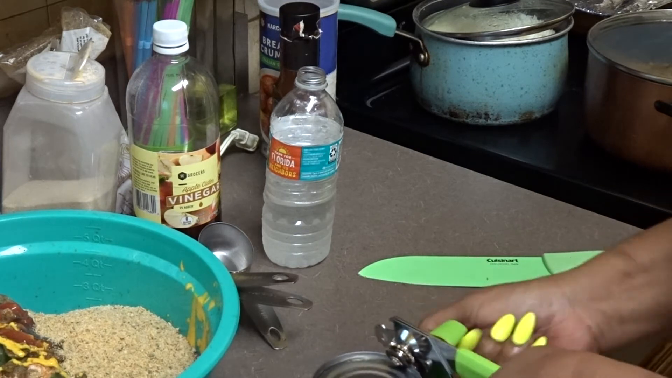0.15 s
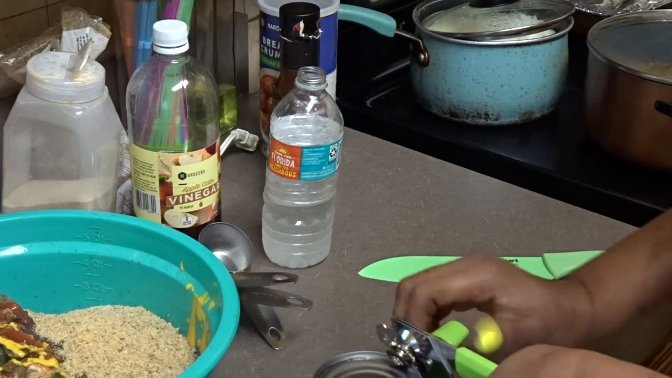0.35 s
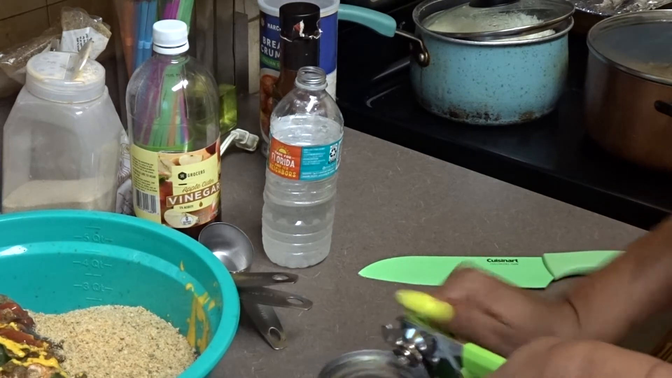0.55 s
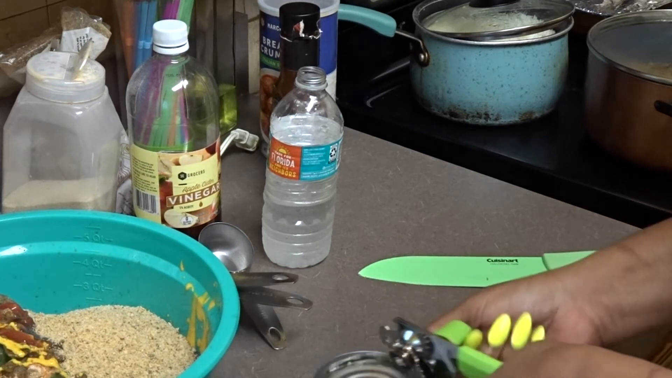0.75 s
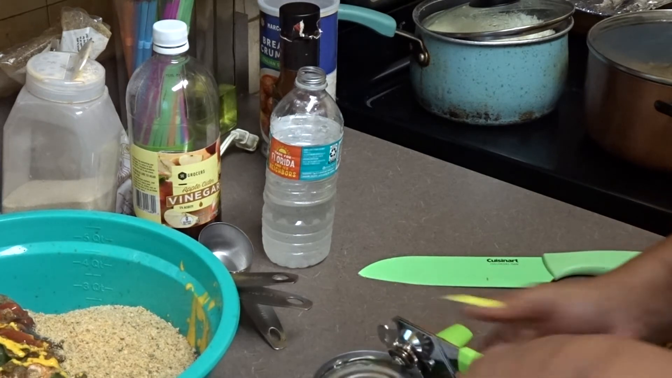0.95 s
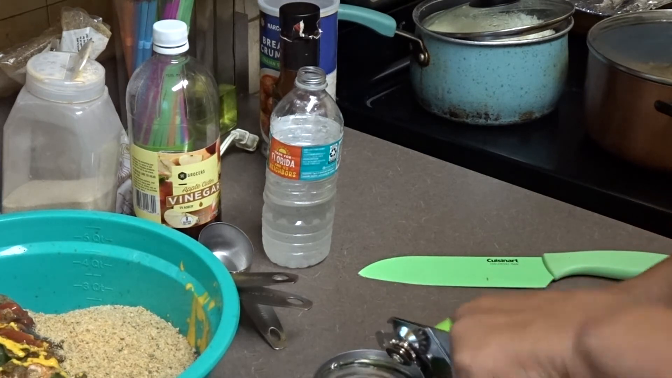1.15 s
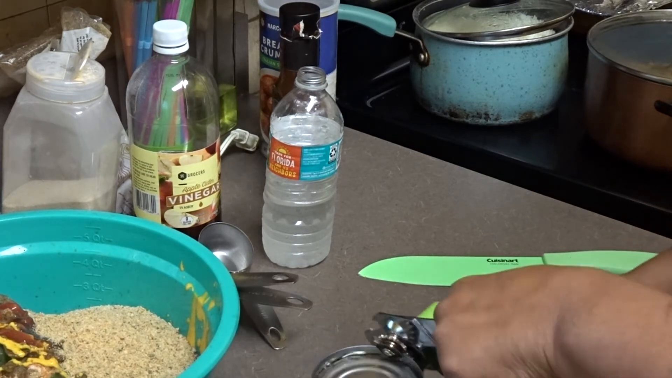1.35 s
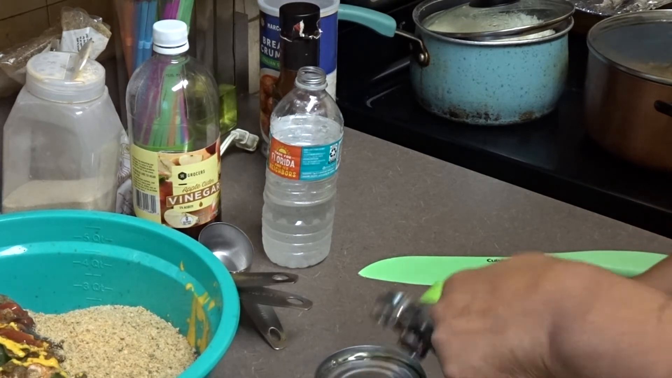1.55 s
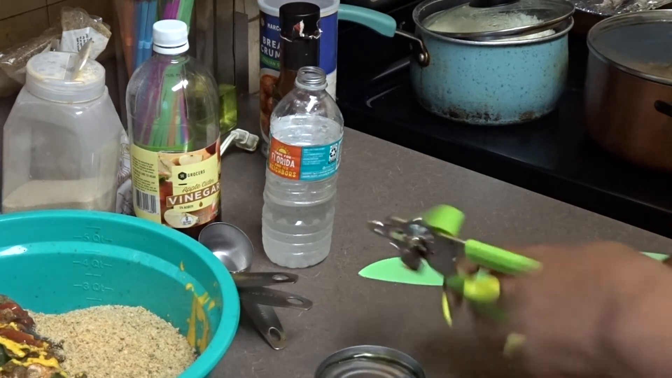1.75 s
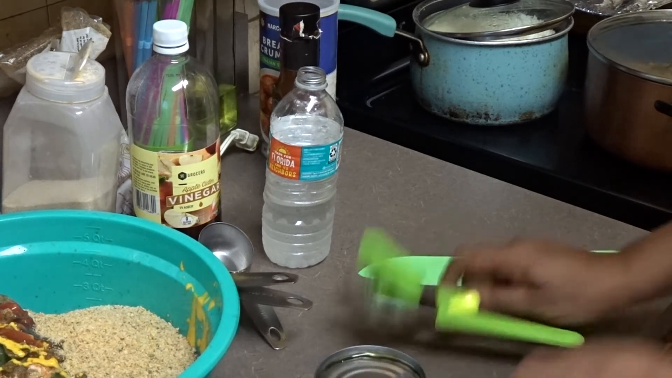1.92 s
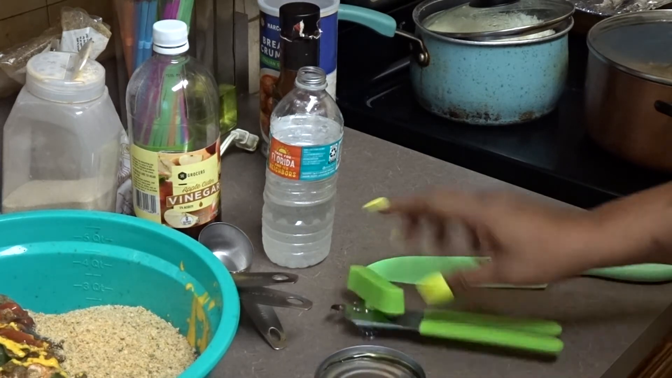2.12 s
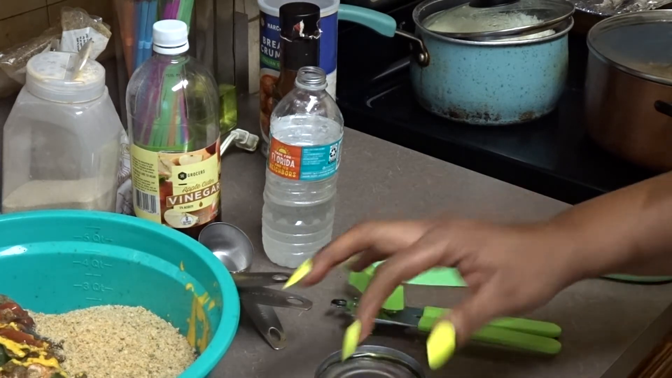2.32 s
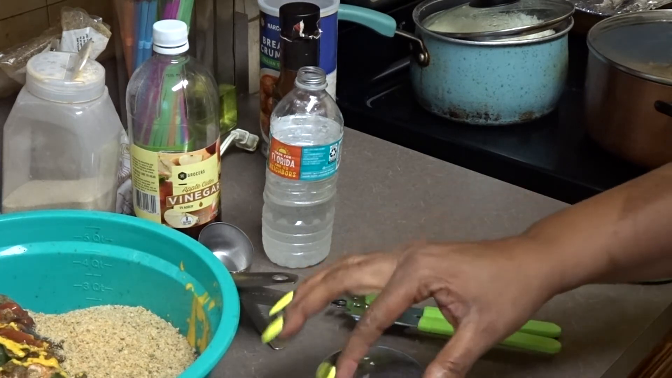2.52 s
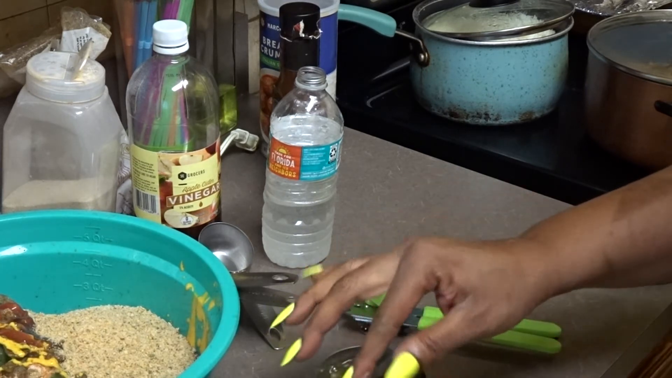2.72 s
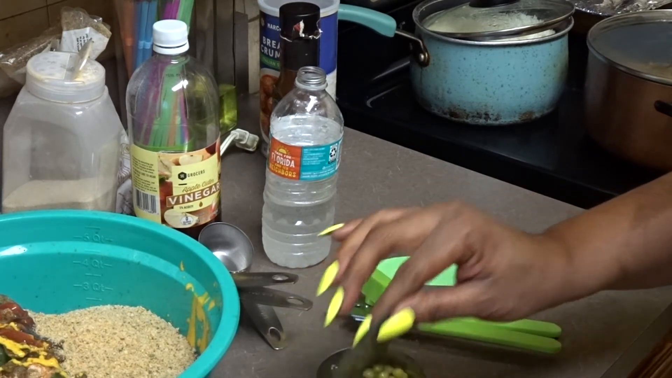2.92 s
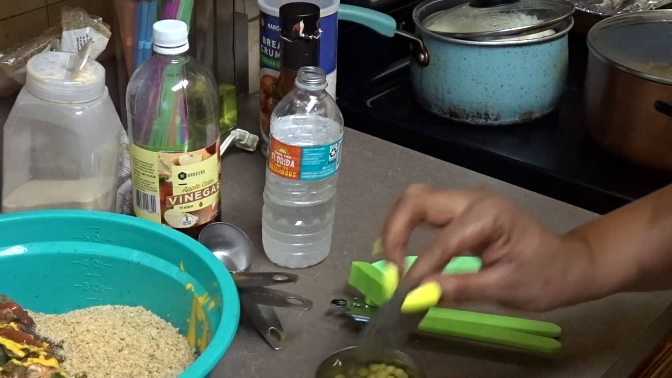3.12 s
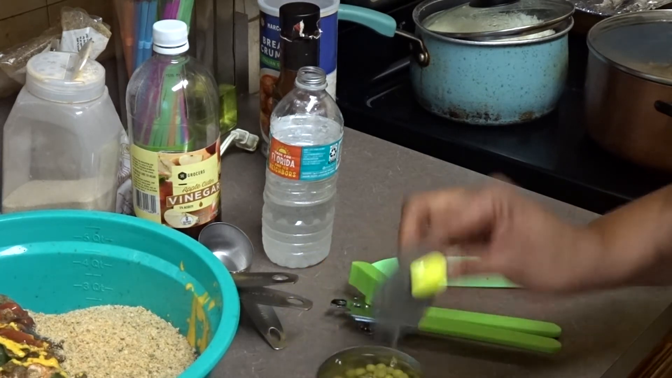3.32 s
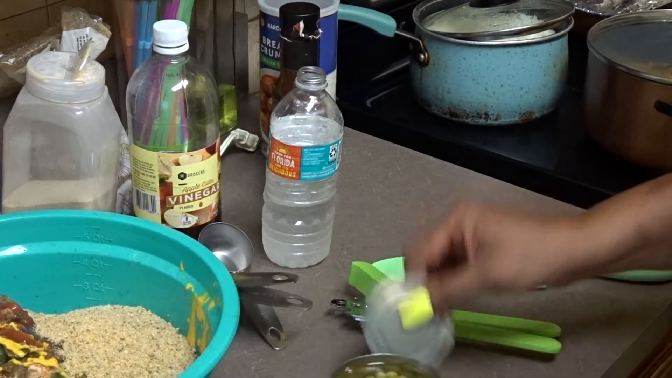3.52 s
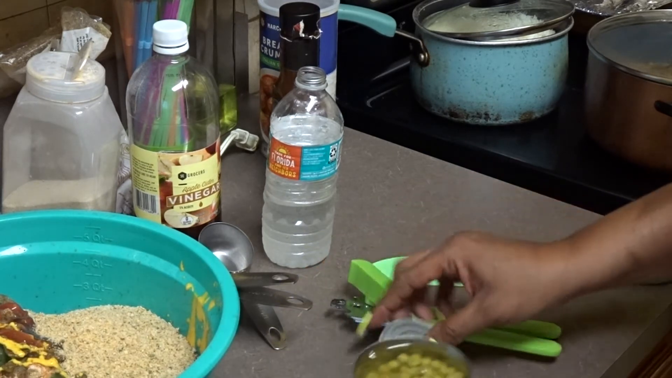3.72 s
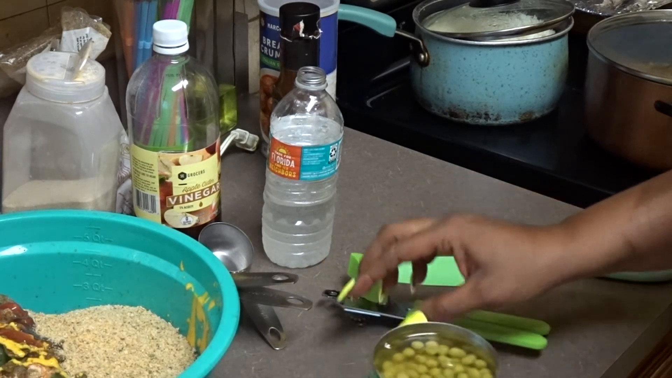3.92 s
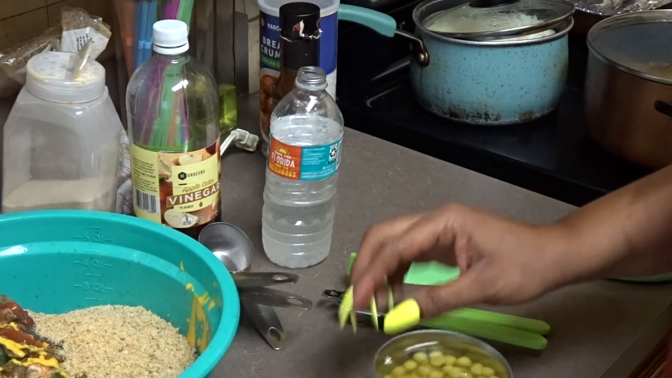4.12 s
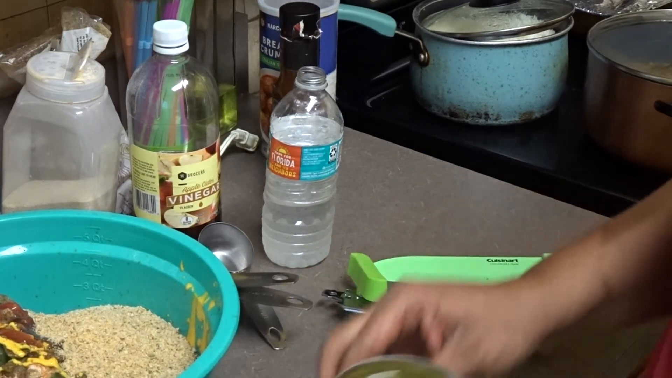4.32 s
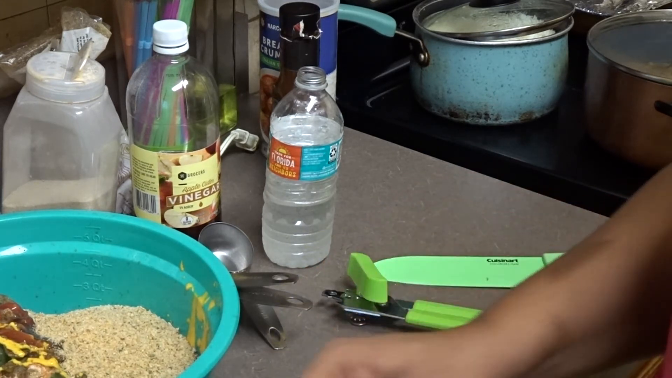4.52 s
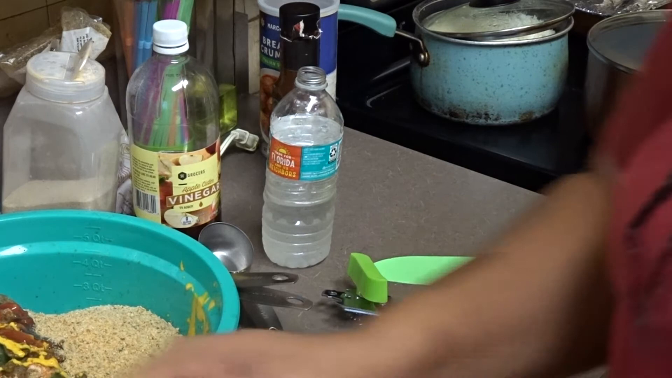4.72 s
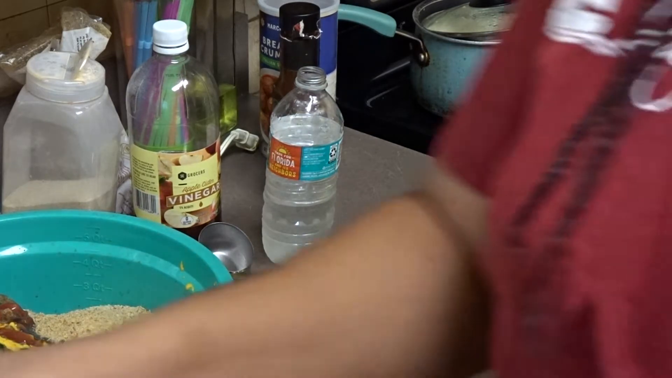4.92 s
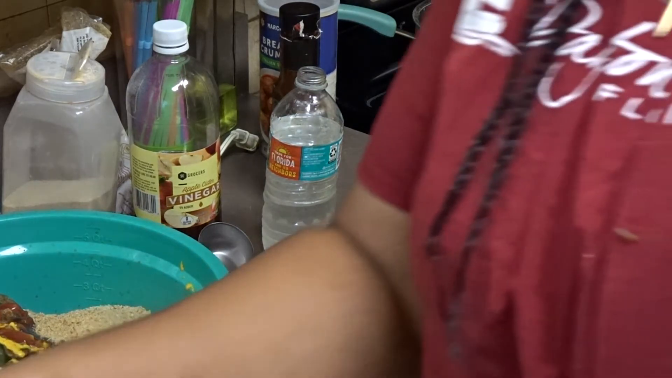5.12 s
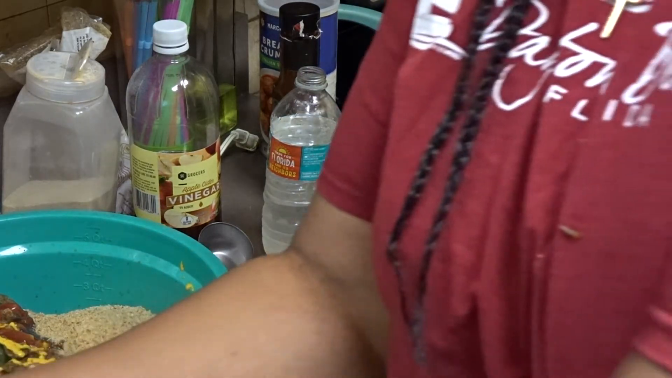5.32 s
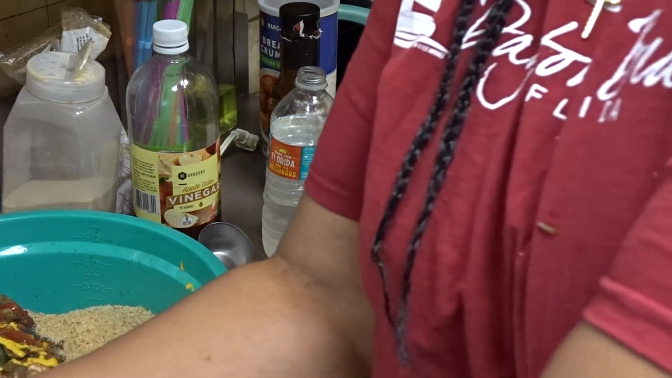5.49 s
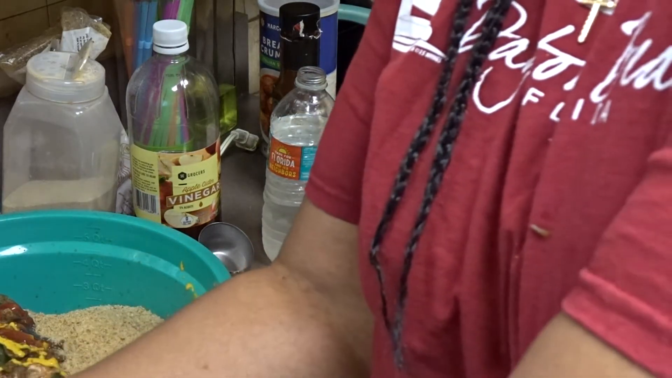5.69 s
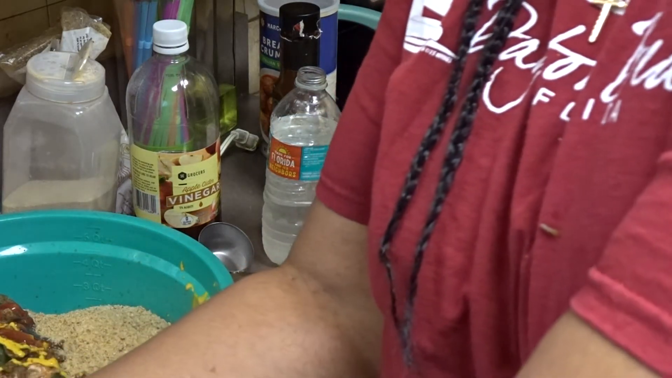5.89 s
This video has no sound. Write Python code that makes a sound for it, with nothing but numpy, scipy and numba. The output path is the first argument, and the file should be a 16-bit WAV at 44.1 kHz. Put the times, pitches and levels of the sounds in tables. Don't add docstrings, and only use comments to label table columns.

```python
import sys
import numpy as np
from scipy import signal
from scipy.fft import rfft, irfft, next_fast_len
from scipy.io import wavfile
from scipy.ndimage import uniform_filter1d
from numba import njit

SR = 44100
rng = np.random.default_rng(int(sys.argv[2]) if len(sys.argv) > 2 else 0)


def undo_db(level):
    steps = np.asarray(level, float) / 20
    return 10 ** steps


def dump(signal):
    limited = np.clip(np.atleast_2d(signal).T, -1, 1)
    pcm = np.round(limited * 32767).astype(np.int16)
    wavfile.write(sys.argv[1], SR, pcm)


N = 262395
BRIGHT_HZ = 4000


def shade(x, points, scale=1):
    hz, db = np.transpose(points)
    size = next_fast_len(x.shape[-1])
    f = np.maximum(np.arange(size // 2 + 1) * SR / size, 1)
    gain = undo_db(scale * np.interp(np.log(f), np.log(hz), db))
    return irfft(rfft(x, size) * gain, size)[..., :x.shape[-1]]


def band(x, hz, width):
    high = np.sqrt(hz ** 2 + width ** 2 / 4) + width / 2
    edges = [hz ** 2 / high, min(high, SR * .45)]
    return signal.sosfilt(signal.butter(2, edges, "band", fs=SR, output="sos"), x)


def unit(x):
    return x / np.sqrt(np.mean(x ** 2))


def add(out, s, sound):
    i = int(np.clip(s * SR, 0, N))
    out[i:i + len(sound)] += sound[:N - i]


def smooth_noise(samples):
    steps = np.repeat(rng.standard_normal(N // samples + 1), samples)[:N]
    return uniform_filter1d(steps, samples)


# frequency_hz, level_db per Hz
HUSH = [(15, -39.5), (25, -4.5), (150, -5), (300, -4.5), (760, -8.5), (1260, -13), (5140, -21.5),
        (16000, -36.5)]
# frequency_hz, side_minus_mid_db
HUSH_SIDE = [(60, -18), (110, -13), (200, -5.5), (380, -3), (700, 2), (2380, 1), (8120, 1.5), (15000, 2)]


def hush():
    mid, side = shade(rng.standard_normal((2, N)), HUSH)
    side = shade(side, HUSH_SIDE)
    level_db = -63 + 0.88 * smooth_noise(4000)
    murmur = np.array([mid + side, mid - side]) * undo_db(level_db) / np.std(mid)
    whine = [unit(band(rng.standard_normal(N), hz=760, width=34)) for _ in range(2)]
    return murmur + undo_db(-71.5) * np.array(whine)


def ring(modes, chance, bright_db):
    hz, db, t60 = np.transpose(modes)[:, :, None]
    t = np.arange(SR // 6) / SR
    jolt = chance[:len(modes), None]
    gain = undo_db(db + 2 * jolt + bright_db * (hz > BRIGHT_HZ))
    sines = np.sin(2 * np.pi * hz * (1 + 0.0052 * jolt[::-1]) * t)
    return np.sum(gain * sines * np.exp(-np.log(1000) * t / t60), axis=0)


def blow(puff, contact_s):
    t = np.arange(len(puff)) / SR
    shape = np.sqrt((1 - np.exp(-t / (0.064 * contact_s))) * np.exp(-t / contact_s))
    for _ in range(3):
        spectrum = rfft(puff * shape)
        puff = irfft(spectrum / np.abs(spectrum))
    return puff * shape


# frequency_hz, level_db, t60_s
COUNTER_MODES = [(51.6, -16.5, 0.72), (176.8, 0.5, 0.24), (221, -2.5, .2), (270.4, 0.5, 0.11),
                 (393.4, -5, 0.16), (513.5, 0.5, 0.14), (770, -9, 0.12), (858, -5.5, 0.41)]


def contacts(rows, body, clack_hz, octaves_per_db, boom_db):
    out = np.zeros(N)
    noise, chance = rng.standard_normal((40, 4, 2048)), rng.standard_normal((40, 16))
    for (s, clack_db, thud_db, knock_db, edge_db), puffs, luck in zip(rows, noise, chance):
        hard_hz = clack_hz * 2 ** (octaves_per_db * edge_db)
        levels = (clack_db, thud_db, knock_db, clack_db + edge_db)
        parts = [(hard_hz, 0.52 * hard_hz, 0.0017), *body]
        for db, puff, (hz, width, contact_s) in zip(levels, puffs, parts):
            burst = band(blow(puff, contact_s), hz, width)
            add(out, s, undo_db(db + 0.5) * burst / np.sqrt(np.sum(burst ** 2) / 120))
        add(out, s, undo_db(thud_db + boom_db) * ring(COUNTER_MODES, luck, 0))
    return out


def metal(rows, modes, chatter_db=5.0):
    out = np.zeros(N)
    for (s, db, bright_db), luck in zip(rows, rng.standard_normal((16, 16))):
        add(out, s, undo_db(db - 3.0) * ring(modes, luck, bright_db))
    return out * undo_db(chatter_db * smooth_noise(150))


# start_s, clack_db, thud_db, knock_db, edge_db (bright tick over the clack)
CRANKED = [(.001, -30, -23, -32, -19), (.016, -28, -24, -36, -26), (.037, -25.5, -19.5, -49, -10.5),
           (.06, -27.5, -27, -33, -31), (.344, -23, -55.5, -43.5, -11.5), (.405, -56, -39, -67, -13),
           (.470, -71, -37, -62, 1), (.4845, -19, -30, -29, -18), (.558, -9, -15, -14.5, -12.5),
           (.588, -36, -6.5, -8.5, -2), (.615, -33, -46, -21, -27), (.675, -34, -11, -16.5, -12),
           (.808, -50.5, -53, -32.5, 2), (.910, -28.5, -14.5, -29.5, -35), (.945, -59, -42.5, -33, -7),
           (1.181, -34, -19, -31.5, -39), (1.355, -60.5, -35, -55.5, -16), (1.415, -51, -37.5, -55, -13),
           (1.438, -46.5, -31, -48, -25), (1.62, -51.5, -69, -67, -22)]
# frequency_hz, width_hz, contact_s
OPENER_BODY = [(340, 526, 0.0086), (1115, 1760, 0.0093), (7100, 9200, 0.0093)]


def cranking():
    return contacts(CRANKED, OPENER_BODY, clack_hz=3700, octaves_per_db=0.022, boom_db=-10)


# frequency_hz, level_db, t60_s
OPENER_MODES = [(1500, -11, .1), (2300, -3, .14), (2410, 3, .12), (2450, 0, .08), (2660, -7, .12),
                (2960, -5, .1), (3730, -6, .12), (4650, -9, .08), (5500, -13, .07), (6180, -15, .06),
                (7800, -18, .05)]
# start_s, level_db, bright_db (extra above the clack range)
OPENER_RINGS = [
    (.016, -42, -5),
    (.4845, -27, -11),
    (.559, -28, 4),
    (.808, -47.5, 5),
    (2.004, -50, 21),
    (2.165, -61, 4),
    (2.376, -48.5, 3.5),
]


def opener_ringing():
    return metal(OPENER_RINGS, OPENER_MODES)


def grit(rate, spread_db):
    clicks = (rng.random(N) < rate / SR) * rng.standard_normal(N)
    sizes = np.minimum(rng.exponential(size=N), 3.5)
    return unit(clicks * undo_db(spread_db * sizes))


@njit
def sweep(x, hz, sharp):
    y, b, l = np.empty(len(x)), 0., 0.
    for i in range(len(x)):
        g = np.tan(np.pi * hz[i] / SR)
        v = (b + g * (x[i] - l)) / (1 + g * (g + 1 / sharp))
        b, l, y[i] = 2 * v - b, l + 2 * g * v, v / sharp
    return y


# peak_s, length_s, rasp_db, rumble_db, rasp_hz
RUBS = [(.135, 0.27, -46.5, -48, 2870), (.252, 0.1, -38, -56, 3220), (1.095, 0.17, -37.5, -48.5, 3380),
        (1.46, 0.16, -58, -41.5, 2560), (1.6, 0.2, -55, -55, 2600), (2.43, 0.17, -45.5, -47.5, 3180),
        (2.66, 0.082, -43.5, -50.5, 3000), (2.83, 0.41, -55, -54.5, 2780), (3.37, 0.21, -43.5, -42, 2700),
        (3.455, 0.1, -40, -57, 2450), (3.6, .04, -47, -59, 3100), (4.17, 0.071, -31, -45, 1847),
        (4.3, 0.26, -38, -51, 2100), (4.49, 0.34, -47.5, -54, 2900), (4.545, 0.15, -21.5, -54, 2370),
        (4.96, 0.14, -44.5, -55, 2550), (5.05, 0.12, -48.5, -59, 2690), (5.165, 0.24, -49.5, -80, 2720)]
# start_s, length_s, level_db, pitch_hz
SQUEAKS = [(.136, 0.03, -48.5, 2900), (.204, 0.072, -47.5, 3220), (.233, 0.024, -53, 8000),
           (2.404, 0.085, -53.5, 3480), (2.448, 0.077, -57, 3780), (2.453, 0.043, -53, 1530),
           (2.646, 0.041, -52.5, 2970), (2.676, 0.027, -52, 4470), (2.685, 0.019, -57, 6500),
           (2.752, 0.037, -58, 2870), (2.835, 0.015, -60.5, 6700), (3.48, .059, -65, 2960)]
# start_s, length_s, level_db, pitch_hz
SHUDDERS = [
    (1.438, 0.096, -37.5, 179),
    (2.698, .08, -44.5, 177),
    (3.022, 0.11, -39.5, 210),
    (3.213, 0.037, -39, 233.7),
]


def rubs():
    t, (rasp, rumble) = np.arange(N) / SR, np.zeros((2, N))
    rise = 0.44
    for peak, length, rasp_db, rumble_db, _ in RUBS:
        away = np.maximum((peak - t) / rise, (t - peak) / (1 - rise)) / length
        stroke = undo_db(-17.5 * away)
        rasp += undo_db(rasp_db) * stroke
        rumble += undo_db(rumble_db) * stroke
    rasp_hz = np.interp(t, *np.transpose(RUBS)[[0, 4]])
    slip = grit(rate=3200.0, spread_db=5.8)
    out = rasp * undo_db(-11.5) * unit(sweep(sweep(slip, rasp_hz, 0.65), rasp_hz, 0.65))
    out += rumble * undo_db(-2.0) * unit(band(slip, 290, 730))
    hiss = rasp * undo_db(-26.5 + 2.5 * np.log2(rasp_hz / BRIGHT_HZ))
    out += hiss * unit(band(slip, 7000, 7000))
    for rows, share in ((SQUEAKS, 0.11), (SHUDDERS, 0.51)):
        for s, length, db, hz in rows:
            i, size = int(s * SR), int(length * SR)
            squeak = unit(band(slip[i:i + size], hz, share * hz))
            add(out, s, undo_db(db) * np.hanning(size) ** .5 * squeak)
    return out


# start_s, level_db, pitch_hz, t60_s
PINGS = [(.344, -36, 3200, 0.014), (.344, -29.5, 3830, 0.015), (.4845, -23.5, 3200, .012),
         (.4845, -28, 4660, .02), (.911, -16.5, 494, 0.021), (1.183, -18.5, 500, 0.022),
         (1.978, -18.5, 740, 0.025), (1.991, -12, 677, .03), (2.012, -11.5, 760, .03),
         (2.034, -13.5, 800, 0.02), (2.13, -13, 510, 0.09), (3.873, -19, 2770, .02),
         (5.79, -43, 5000, .004), (.4845, -19, 2450, .015), (.557, -25.5, 3800, .01),
         (.560, -9.5, 2290, .03), (.560, -18, 3750, .03), (.562, -27, 5500, 0.022), (.676, -13, 620, .03),
         (.637, -27, 3700, .015), (1.964, -12.5, 700, .03), (1.972, -12.5, 690, .03),
         (1.976, -22, 2750, .015), (2.004, -24.5, 6500, .02), (2.025, -21, 3000, .02),
         (2.1205, -12.5, 2800, .012), (2.127, -19.5, 10840, .01), (2.14, -42, 10900, .03),
         (2.164, -13, 1700, .03), (2.164, -25, 5480, .03), (3.254, -31, 6000, .01),
         (3.514, -48.5, 3050, .06), (3.514, -53, 4700, 0.018), (3.62, -39.5, 6180, .1),
         (3.62, -43, 8930, .06), (3.62, -40.5, 10230, .06), (3.62, -41.5, 5520, .07),
         (3.62, -35, 3715, .06), (3.768, -45, 7300, .03), (3.822, -23.5, 6600, 0.022),
         (3.826, -26.5, 11200, .025), (3.908, -27.5, 11300, .02), (3.924, -22.5, 5050, 0.024),
         (3.211, -21, 876, 0.076), (3.045, -35, 2820, .15), (3.095, -39, 2787, 0.13),
         (3.33, -45, 879, 0.15), (.344, -36, 2820, .012), (4.155, -36, 1505, 0.013)]


def pings():
    out, t = np.zeros(N), np.arange(SR // 6) / SR
    for s, db, hz, t60 in PINGS:
        add(out, s, undo_db(db) * np.sin(2 * np.pi * hz * t) * np.exp(-np.log(1000) * t / t60))
    return out


# start_s, clack_db, thud_db, knock_db, edge_db
TAPS = [
    (.879, -45.5, -31, -48, -3),
    (1.329, -35.5, -54, -41.5, -40.5),
    (1.375, -48, -64.5, -45.5, -13.5),
    (1.951, -32.5, -30, -33, -7),
    (2.376, -38, -43.5, -35, -13),
    (2.69, -43.5, -49.5, -67.5, -31),
    (2.85, -51, -57, -51.5, -29),
    (5.096, -51, -74, -53, -7),
]


def taps():
    return contacts(TAPS, OPENER_BODY, clack_hz=4370, octaves_per_db=0.0073, boom_db=-12.5)


# start_s, clack_db, thud_db, knock_db, edge_db
LAID = [(1.964, -22, -7, -21.5, -1.5), (1.983, -30.5, -17, -22, -5), (2.002, -26, -17, -12, 4),
        (2.028, -21, -11, -18, -7.5), (2.042, -26.5, -16.5, -15, -3.5), (2.094, -17.5, -16.5, -12, -2.5),
        (2.121, -27, -10.5, -11, -18), (2.165, -17, -24, -13.5, -20), (2.244, -27.5, -17, -43, -32),
        (2.29, -59, -56, -61, -21), (1.9995, -25, -28.5, -15, -6), (2.099, -25, -34, -27, -11),
        (2.13, -23, -18, -21, -17), (2.141, -22, -26, -18, -32)]
# frequency_hz, width_hz, contact_s
LAID_BODY = [(565, 580, 0.01), (1260, 2300, 0.0078), (7000, 14000, 0.017)]


def laying_down():
    return contacts(LAID, LAID_BODY, clack_hz=3340, octaves_per_db=0.019, boom_db=-15.0)


# start_s, clack_db, thud_db, knock_db, edge_db
LID = [(2.656, -49, -59.5, -70, -16), (2.714, -56, -40, -45.5, -14), (3.037, -33, -21, -24.5, -7.5),
       (3.09, -48, -62, -34.5, 4), (3.210, -17, -27, -13.5, -22.5), (3.254, -34.5, -45.5, -52, 3),
       (3.514, -54.5, -68, -53, -8.5), (3.619, -38.5, -22, -16.5, 10), (3.767, -28.5, -36, -40.5, -5.5),
       (3.78, -29, -39.5, -36.5, -6.5), (3.791, -15, -11, -13, -31.5), (3.814, -19, -23.5, -29.5, -17),
       (3.835, -17.5, -16, -20, -10.5), (3.852, -26, -24, -24.5, -8.5), (3.873, -25.5, -45.5, -30, -15),
       (3.903, -14, -32.5, -25.5, -11), (3.912, -30.5, -50, -36.5, -9.5), (3.922, -13, -38.5, -21.5, -18.5),
       (3.822, -18.5, -41.5, -32, 0), (3.845, -22, -28.5, -29, -11), (3.9065, -17, -42.5, -30, 4.5)]
# frequency_hz, width_hz, contact_s
LID_BODY = [(537, 470, 0.0034), (900, 1650, 0.011), (8000, 34000, 0.0039)]
# frequency_hz, level_db, t60_s
LID_MODES = [(880, 3, .16), (2060, -12, .08), (2510, -8, .07), (2775, 2, .11), (2830, -2, .09),
             (3220, -1, .11), (3290, -3, .09), (3715, -15, .06), (5190, -17, .07), (5520, -17, .06),
             (6190, -13, .1), (7350, -21, .07), (8950, -16, .05), (10800, -17, .05)]
# start_s, level_db, bright_db
LID_RINGS = [
    (2.656, -64.5, -8),
    (3.04, -51, -8.5),
    (3.07, -46, -6),
    (3.10, -56, -14),
    (3.14, -59.5, -8),
    (3.211, -49, 1),
    (3.619, -30.5, 1),
]


def lid_lifting():
    struck = contacts(LID, LID_BODY, clack_hz=2710, octaves_per_db=0.0068, boom_db=-17.5)
    return struck + metal(LID_RINGS, LID_MODES)


# start_s, level_db, bright_db
FREE_RINGS = [
    (3.785, -27.5, -17),
    (3.813, -15, -11.5),
    (3.822, -15, -12),
    (3.833, -11.5, -17.5),
    (3.845, -16, -17.5),
    (3.858, -22, -13.5),
    (3.873, -16, -16.5),
    (3.887, -21, -17.5),
    (3.897, -28, -15),
]


def free_lid():
    damped = np.multiply(LID_MODES[1:], (1, 1, 0.7))
    return metal(FREE_RINGS, damped, chatter_db=0.5)


# frequency_hz, level_db, t60_s
BENT_MODES = [(1980, -5.5, .04), (2440, -6, 0.039), (2540, 0, .04), (2826, -3.5, .04), (3273, -6, .04),
              (4180, -14, .04), (4590, -13, .03), (5020, -16.5, .025), (6430, -10.5, .04),
              (6930, -12, 0.044), (11280, -15.5, .03)]
# start_s, level_db, bright_db
BENT_RINGS = [
    (3.903, -21, -4),
    (3.9065, -17.5, 0.5),
    (3.915, -13.5, -6.5),
    (3.922, -17.5, -2.5),
    (3.94, -29, -9),
    (3.955, -30, -8),
    (3.97, -28, -8),
]


def bent_lid():
    return metal(BENT_RINGS, BENT_MODES, chatter_db=4.5)


def reverberate(x, room):
    return signal.fftconvolve(x[None], room, axes=1)[:, :N]


# start_s, clack_db, thud_db, knock_db, edge_db
KNOCKS = [
    (4.149, -30.5, -46, -34, -34),
    (4.159, -48, -67, -42, -34.5),
    (4.283, -46, -45.5, -36.5, -10),
    (4.532, -33, -62, -33.5, -37),
    (4.713, -25, -54.5, -18, -14.5),
    (4.719, -40, -34.5, -10, -7.5),
    (4.726, -16, -27, -32, -10.5),
]
# frequency_hz, width_hz, contact_s
KNOCK_BODY = [(497, 910, 0.0094), (1140, 1370, 0.0053), (7040, 7000, 0.016)]
# time_s, left_minus_right_db
KNOCK_PANS = [
    (4.15, 0),
    (4.53, -3.5),
    (4.72, 0),
]


def knocks(room):
    struck = contacts(KNOCKS, KNOCK_BODY, clack_hz=5570, octaves_per_db=0.05, boom_db=-17.0)
    lean_db = np.interp(np.arange(N) / SR, *np.transpose(KNOCK_PANS)) * np.array([[.5], [-.5]])
    return reverberate(struck, room) * undo_db(lean_db)


def bubble(hz, glide, cycles):
    t = np.arange(1400) / SR
    sine = np.sin(2 * np.pi * hz * t * (1 + glide * t))
    return sine * np.minimum(t * hz / 1.24, 1) * np.exp(-t * hz / cycles)


# time_s, flow_db
POUR = [
    (5.59, -68),
    (5.634, -23),
    (5.688, -33),
    (5.732, -9),
    (5.85, -10),
    (5.875, -5.5),
    (5.91, -0.5),
    (5.95, -19),
]
# start_s, level_db, pitch_hz
SPLASHES = [(5.636, -55.5, 3220), (5.64, -57.5, 4700), (5.673, -49.5, 1910), (5.671, -50.5, 3200),
            (5.716, -42.5, 5770), (5.76, -59, 4130), (5.789, -39.5, 2870), (5.79, -40.5, 5770),
            (5.838, -38.5, 6350), (5.853, -34.5, 3700), (5.866, -35, 6000), (5.892, -33.5, 2950),
            (5.894, -32, 4170), (5.915, -49, 3120), (5.93, -40, 4720), (5.71, -51, 3400),
            (5.729, -51, 7500), (5.802, -48, 4300), (5.882, -40, 5800)]
# start_s, level_db, pitch_hz
GLUGS = [(5.615, -36, 650), (5.645, -41, 650), (5.659, -52, 573), (5.674, -42, 820), (5.718, -51, 920),
         (5.79, -42, 1310), (5.805, -36.5, 1390), (5.833, -31.5, 1390), (5.867, -28.5, 1290),
         (5.881, -31.5, 706), (5.899, -36.5, 772), (5.923, -30, 862), (5.939, -34.5, 903), (5.63, -48, 636),
         (5.69, -51, 844), (5.911, -35, 826)]


def brine():
    t = np.arange(N) / SR
    flow_db, on = np.interp(t, *np.transpose(POUR)), t > POUR[0][0]
    fizz = unit(band(grit(rate=2000., spread_db=7.0), 3400, 4400))
    spray = unit(band(grit(rate=4000., spread_db=1.2), 9500, 10000))
    drum = unit(band(rng.standard_normal(N), 210, 310))
    out = on * undo_db(-44.5 + flow_db) * fizz
    out += on * undo_db(-49 + 0.85 * flow_db) * spray
    out += on * undo_db(-58.5 + 0.45 * flow_db) * drum
    for (s, db, hz), drops in zip(SPLASHES, rng.standard_normal((20, 10, 3))):
        add(out, s, undo_db(db + 11.5) * np.array([1, -.6]))
        for k, (late, pitch, size) in enumerate(drops):
            drop = bubble(hz * (1 + .14 * pitch), glide=11.0, cycles=9.4)
            add(out, s + k * 0.0021 * (1 + .3 * late), undo_db(db + 4.3 * size - 0.83 * k) * drop)
    for (s, db, hz), pitch in zip(GLUGS, rng.standard_normal(20)):
        add(out, s, undo_db(db - 0.5) * bubble(hz, glide=2.1, cycles=3.2))
        echo = bubble(hz * (1 + .06 * pitch), glide=1.9, cycles=14.0)
        add(out, s + 0.0085, undo_db(db - 10.0) * echo)
    return out


def sink(room):
    water = brine()
    return (undo_db(2.5) * reverberate(water, room) + undo_db(-12) * water) * undo_db(np.array([[1.5], [-.5]]))


# frequency_hz, t60_s
ROOM_T60 = [(60, 1), (130, 0.25), (260, 0.25), (700, 0.3), (2000, 0.31), (5000, 0.29), (13000, 0.23)]
# frequency_hz, side_minus_mid_db
PORT_SIDE = [(60, -34.5), (125, -66), (250, -34), (500, -18.5), (1000, -10), (2000, -6.5), (4000, -1),
             (12000, 2.5)]


def kitchen():
    t, build_s = np.arange(SR) / SR, 0.0025
    hz, t60 = np.transpose(ROOM_T60)
    tail = 0
    for centre in 40 * 2. ** np.arange(9):
        quick_db = -60 * t / np.interp(np.log(centre), np.log(hz), t60)
        slow_db = -41 - 60 * t / 1.3
        noise = band(rng.standard_normal((2, SR)), centre, centre * .71)
        tail = tail + noise * (undo_db(quick_db) + undo_db(slow_db))
    mid, side = tail * (1 - np.exp(-t / build_s)) * undo_db(-3.5) / np.sqrt(np.sum(tail[0] ** 2))
    side = shade(side, PORT_SIDE) * np.minimum(t / build_s, 1)
    mid[0] += .42
    return np.array([mid + side, mid - side])


def near(x, db):
    return undo_db(db) * np.array([np.roll(x, shift=1), x])


def scene():
    room = kitchen()
    murmur = hush()
    opener = cranking() + opener_ringing() + taps() + laying_down()
    lid = lid_lifting()
    loose, parts = free_lid() + bent_lid(), pings()
    heard = reverberate(opener + lid + rubs(), room) + knocks(room) + sink(room)
    heard += undo_db(-1.5) * reverberate(loose + parts, kitchen())
    heard += near(loose, -7.5) + near(parts, -3.5) + near(opener + lid, -21.5)
    bass_cut = signal.butter(2, 216, "high", fs=SR, output="sos")
    return signal.sosfilt(bass_cut, heard) + murmur


@njit
def follow(x, attack, release):
    e, out = 1e-6, np.empty(len(x))
    for i in range(len(x)):
        e += (x[i] - e) * (attack if x[i] > e else release)
        out[i] = e
    return out


# frequency_hz, left_minus_right_db
PORT_LEAN = [(500, 0), (2000, -0.9), (5000, 0), (9000, -3.5), (15000, -4)]
# frequency_hz, level_db
MIC = [(9000, 1), (13000, -2.5), (15700, 1), (16300, -40)]


def top_cut(x):
    return signal.sosfilt(signal.butter(12, 15950, fs=SR, output="sos"), x)


def record(dry):
    ports = [shade(dry[0], PORT_LEAN, scale=.5), shade(dry[1], PORT_LEAN, scale=-.5)]
    x = shade(np.array(ports), MIC)
    attack_s, release_s, limit_db, ratio = 0.0061, 0.027, -9, 2
    level = follow(np.abs(x).max(axis=0), 1 / (attack_s * SR), 1 / (release_s * SR))
    x = x * np.minimum(undo_db(limit_db) / level, 1) ** (1 - 1 / ratio)
    x = np.tanh(1.042 * x) / 1.156
    return top_cut(x)


dry = scene()
out = record(dry)
dump(out)
```